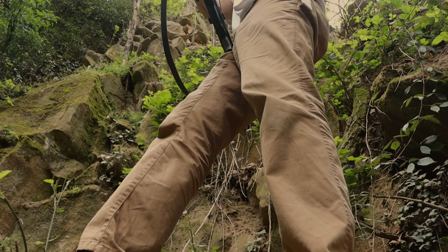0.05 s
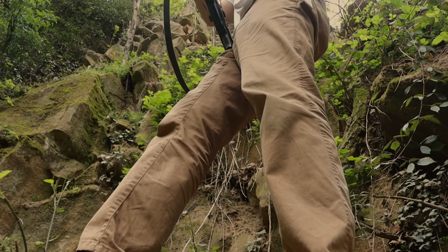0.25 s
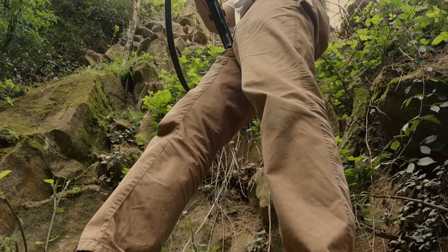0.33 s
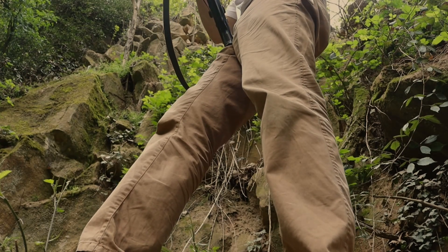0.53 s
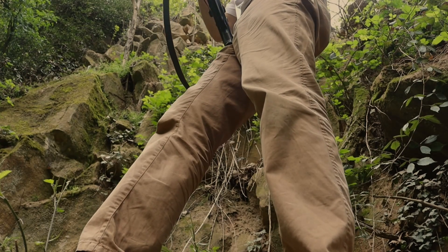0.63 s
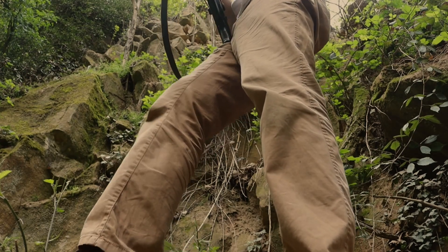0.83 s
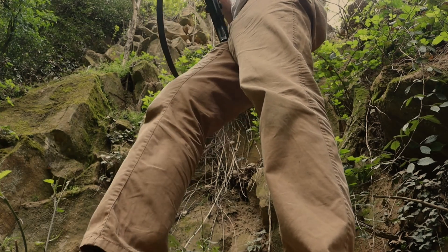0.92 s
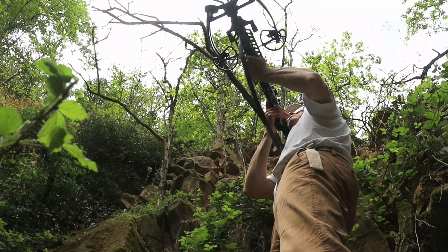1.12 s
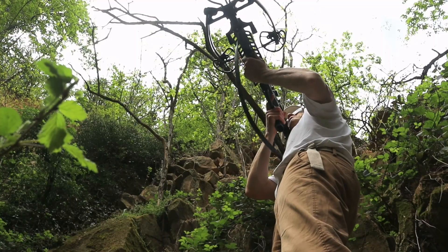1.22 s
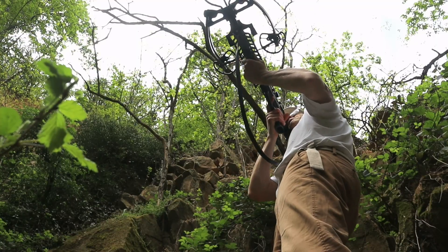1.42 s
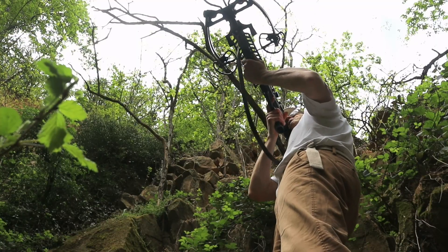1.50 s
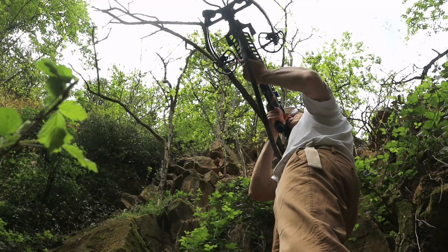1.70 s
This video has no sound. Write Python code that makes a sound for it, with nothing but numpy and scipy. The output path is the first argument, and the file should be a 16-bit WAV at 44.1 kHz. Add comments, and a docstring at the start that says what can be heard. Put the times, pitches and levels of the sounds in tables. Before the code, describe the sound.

A crossbow handled close to the microphone ticks lightly, then snaps twice and rattles briefly. Clothing rustles and a songbird whistles behind it. The woods then turn quieter, leaving distant bird calls and a faint low drone.

```python
"""A crossbow handled close to the microphone in a wood: the stock ticks under load, a catch snaps twice, parts
slide and rattle. Each contact rings the stock or frame and scatters off nearby rock and ground. Clothing
rustles. A songbird whistles a falling-and-rising phrase, then a flourish that lingers among the trees. Just
before one second the scene changes to a quieter, deeper wood with far calls and a low drone."""
import sys
import numpy as np
from scipy import signal
from scipy.fft import rfft, irfft
from scipy.io import wavfile
from scipy.ndimage import uniform_filter1d

SR = 44100
rng = np.random.default_rng(int(sys.argv[2]) if len(sys.argv) > 2 else 0)


def file_out(sig):
    """Save sig as 16-bit WAV at sys.argv[1]."""
    # one column per channel
    cols = np.atleast_2d(sig).T
    # limit, then scale
    lim = np.clip(cols, -1, 1)
    pcm = np.round(lim * 32767).astype(np.int16)
    wavfile.write(sys.argv[1], SR, pcm)


N = 77175
T = np.arange(N) / SR

# Levels are relative within each table.
# woodland air, early and late, and its side signal against the middle: frequency_hz, level_db
EARLY_AIR_COLOUR = [(15, -36), (25, -5.5), (200, 4.5), (344, -9), (695, -5), (775, -6.5), (1740, -12),
                    (2410, -7.5), (2760, -17), (4870, -11), (6380, -20), (13200, -29), (16000, -32)]
LATE_AIR_COLOUR = [(15, -34), (25, -15.5), (130, -0.5), (185, -6), (263, -11), (384, -18), (451, -15),
                   (516, -19), (796, -14.5), (1480, -21.5), (2410, -22), (2990, -24), (3720, -27.5),
                   (5000, -30), (16000, -39)]
AIR_WIDTH = [(30, 0), (120, -12.5), (270, -0.5), (700, -4.5), (3000, -3), (14000, 5)]
# swell of the far drone and of the close clothing: time_s, level_db
DRONE_SWELL = [(0, -67), (1.05, -64), (1.25, -57), (1.45, -53), (1.62, -56), (1.75, -60)]
RUSTLE_SWELL = [(0, -44.5), (.06, -56.5), (.17, -57), (.25, -49), (.30, -47.5), (.36, -50), (.43, -45),
                (.62, -50.5), (.80, -86), (.99, -53)]
# sleeve scuffs: centre_s, half_width_s, level_db
SLEEVE_SCUFFS = [(0.891, 0.012, -56), (0.948, 0.027, -54), (0.96, .007, -54), (0.977, .003, -47)]
# spectra of rustle and scuffs: frequency_hz, level_db
CLOTH_COLOUR = [(300, -8.5), (900, -6.5), (1900, -9.5), (3000, -4.5), (6000, -8.5), (15000, -16.5)]
SLEEVE_COLOUR = [(300, -22), (600, -2), (850, 13), (1300, 2.5), (2000, 1.5), (3000, -14), (6000, -34),
                 (15000, -36)]

# light ticks of the stock: start_s, level_db, tilt_db_per_octave
STOCK_TICKS = [(.0007, -27.5, 0.5), (0.0448, -21.5, 3.5), (0.0553, -36, -3), (0.0772, -33, -6.5),
               (0.1042, -29, 0), (0.1312, -28, -1.5), (0.1371, -36, -3), (0.2072, -20.5, 2.1),
               (0.2328, -21, 3), (0.2362, -30.5, 9.5)]
# snaps and knocks of the catch: start_s, level_db, tilt_db_per_octave, hollow_db
CATCH_SNAPS = [(0.4454, -8.5, -1, -37), (.447, -10, 1.2, -28), (0.457, -33, -1.5, -24),
               (0.4598, -21.5, -3.5, -22), (0.503, -4.5, 3, -7.5), (.504, -10, 0.5, -0.5),
               (.5374, -17, -3, -7.5), (0.5381, -15, 7, -27), (.5474, -11, 6.5, -25), (0.555, -14, 3, -25),
               (0.5591, -14.5, -0.5, 1), (.5685, -17.5, 2.5, -1), (.576, -23, -8.5, -21)]
# lasting modes of stock and frame: pitch_hz, level_db, t60_s
STOCK_RESONANCES = [(1176, -15.5, 0.077), (1293, -11, 0.097), (1700, -2, 0.01), (1848, -1.5, .04),
                    (2330, -11.5, 0.083), (2970, -7.5, 0.042), (5490, -4, 0.0085), (6250, -34, 0.026)]
FRAME_RESONANCES = [(728, -20, 0.039), (966, -19, 0.044), (1069, -14, 0.18), (1202, -8, 0.07),
                    (1790, -5.5, 0.082), (2000, -22, 0.047), (2444, -15, 0.046), (2967, -6, 0.068),
                    (3137, -2.5, 0.04), (3810, 0.5, 0.021), (4543, -2.5, 0.049), (6796, -2.5, 0.029),
                    (7580, -2, 0.023), (10830, -4.5, 0.03)]
# spectra of their dense, brief modes and of the sliding contact: frequency_hz, level_db
STOCK_CRACK = [(300, -21.5), (850, -8.5), (1250, 6), (1850, 8.5), (2200, -3.5), (4300, -5.5), (5600, -4.5),
               (10000, -11), (15000, -38.5)]
FRAME_CRACK = [(200, -51), (460, -33), (680, 1), (1100, 0), (1450, -6.5), (2000, 4), (2900, -0.5),
               (3450, -5.5), (5000, -1.5), (7300, -2.5), (9000, -4), (12500, -6), (16000, -19)]
GRIT_COLOUR = [(250, -28), (530, -26), (680, 15), (1000, 11), (1900, -3), (2900, 8.5), (3450, -10),
               (4300, 3), (7300, 0.5), (9300, -9), (10800, -8), (12300, 1.5), (15000, -21)]
# swell of the sliding contact: time_s, level_db
SLIDE_SWELL = [(.522, -58), (.531, -34), (.543, -31), (.557, -21.5), (.570, -25.5), (.580, -32),
               (.590, -60)]

# the songbird's two notes: time_in_note_s, pitch_hz, level_db
FALLING_NOTE = [(0, 7100, -14), (.015, 6320, -15), (.034, 5350, -9.5), (.049, 4700, 0), (.064, 4150, -12.5),
                (.076, 4300, -13)]
RISING_NOTE = [(0, 2800, -27), (.009, 3365, -6), (.013, 4105, 0), (.022, 4120, -6), (.025, 3900, -23)]
# their repeats: start_s, level_db
FALLING_REPEATS = [(.031, -37), (.201, -33.5), (.372, -35.5), (.549, -34)]
RISING_REPEATS = [(0.112, -37.5), (.286, -34), (.460, -31), (.638, -33)]
# closing strokes and distant whistles, one list each: time_s, pitch_hz, level_db
FLOURISH_STROKES = [
    [(.716, 7600, -58), (.725, 5900, -45), (.731, 4500, -41), (.736, 3200, -49)],
    [(.733, 3000, -54), (.749, 3800, -40), (.757, 3950, -49), (.764, 4800, -37.5), (.778, 5300, -52)],
    [(.745, 2400, -56), (.762, 2300, -48.5), (.772, 2750, -52.5), (.779, 4000, -42), (.784, 5300, -67)],
]
FAR_WHISTLES = [
    [(1.0, 4580, -57), (1.03, 4530, -57), (1.062, 4470, -59)],
    [(1.27, 3830, -61), (1.315, 3720, -51.5), (1.355, 3600, -52), (1.42, 3730, -57)],
    [(1.09, 2206, -62.5), (1.2, 2135, -66.5), (1.36, 2180, -59.5), (1.46, 2400, -66)],
    [(1.465, 2434, -48), (1.50, 2472, -50.5), (1.54, 2470, -63)],
    [(1.574, 2470, -47), (1.60, 2490, -57.5), (1.65, 2490, -65), (1.68, 2403, -68)],
    [(1.47, 4540, -54), (1.495, 4520, -57), (1.56, 4330, -67)],
    [(1.725, 3760, -62), (1.75, 3700, -51)],
]
# one distant hoarse, rising call: time_s, pitch_hz, level_db
FAR_HOARSE_CALL = [(1.31, 3670, -56), (1.37, 3660, -51), (1.43, 3850, -53.5), (1.50, 4110, -54),
                   (1.57, 4360, -71)]


def undb(db):
    """Decibels to gain."""
    return 10 ** (np.asarray(db) / 20)


def unit(x):
    """Scale to rms 1."""
    return x / np.sqrt(np.mean(x ** 2) + 1e-20)


def curve(points, t):
    """Straight lines between (time_s, value) points."""
    return np.interp(t, *np.array(points).T)


def colour(x, points):
    """Filter by (frequency_hz, level_db) points."""
    hz, db = np.array(points).T
    bins_hz = np.maximum(np.fft.rfftfreq(x.shape[-1], 1 / SR), 1)
    return irfft(rfft(x) * undb(np.interp(np.log(bins_hz), np.log(hz), db)), x.shape[-1])


def stereo(mid, side):
    """Left and right from mid and side."""
    return np.array([mid + side, mid - side])


def fade(t, t60):
    """Exponential decay, 60 dB down after t60 seconds."""
    return np.exp(-np.log(1000) * t / t60)


def add(out, x, start_s):
    """Mix a sound in at its time."""
    i = max(int(start_s * SR), 0)
    out[:, i:i + x.shape[1]] += x[:, :N - i]


def wander(rate_hz):
    """Smooth random motion with rms 1."""
    span = max(int(SR / rate_hz), 1)
    return unit(uniform_filter1d(uniform_filter1d(rng.standard_normal(N), span), span))


def echoes(x, t60, side, build_s=0.0021):
    """Diffuse reflections that build up and die away at the microphone."""
    mid, wide = rng.standard_normal((2, N))
    envelope = fade(T, t60) * (1 - np.exp(-T / build_s))
    tail = unit(stereo(mid, side * wide) * envelope) / np.sqrt(N)
    return signal.fftconvolve(x[None], tail, axes=1)[:, :N]


def woodland_air(shape, level_db):
    """A soft, wide hush all around the microphone."""
    mid, side = colour(rng.standard_normal((2, N)), shape)
    return unit(stereo(mid, colour(side, AIR_WIDTH))) * undb(level_db + 0.2 * wander(2.3))


def far_drone(pitch_hz=49):
    """A low, wavering tone a long way off, faint at first and swelling late."""
    wavering_hz = pitch_hz * (1 + .03 * wander(11))
    return np.sin(2 * np.pi * np.cumsum(wavering_hz) / SR) * undb(curve(DRONE_SWELL, T))


def clothing():
    """Close by, cloth brushes unevenly as the arms move, with brief scuffs of a sleeve."""
    mid, side = unit(colour(rng.standard_normal((2, N)), CLOTH_COLOUR))
    rustle = stereo(mid, 0.41 * side) * undb(curve(RUSTLE_SWELL, T) + 1 + 1.4 * wander(130))
    mid, side = unit(colour(rng.standard_normal((2, N)), SLEEVE_COLOUR))
    scuffs = sum(undb(db) * np.exp(-.5 * ((T - at) / width) ** 2) for at, width, db in SLEEVE_SCUFFS)
    return rustle + stereo(mid, 0.16 * side) * scuffs * undb(2.3 * wander(400))


def contact(modes, shape, tilt_db, crack_t60_s, ring_db, attack_s=0.00021, width=0.14, size=8192):
    """One contact: a crack of dense modes whose treble dies first, and a few lasting modes."""
    t = T[:size]
    bins_hz = np.maximum(np.fft.rfftfreq(size, 1 / SR), 1)
    phases = np.exp(2j * np.pi * rng.random((2, len(bins_hz))))
    tilted_noise = irfft(phases * undb(tilt_db * np.log2(bins_hz / 3000)))
    spectrum = rfft(unit(colour(tilted_noise, shape)))
    octave = np.clip(np.log2(bins_hz / 500), 0, 5)
    attack = 1 - np.exp(-t / attack_s)
    mid = side = 0
    for k in range(6):  # the crack, octave by octave; crack_t60_s holds at 2 kHz
        hz = 500 * 2 ** k
        band = irfft(spectrum * np.maximum(1 - abs(octave - k), 0))
        envelope = attack * fade(t, crack_t60_s * (hz / 2000) ** -0.4)
        strength = np.sqrt(np.mean(band ** 2) * np.mean(envelope ** 2))
        mid += strength * unit(band[0] * envelope)
        side += strength * unit(band[1] * envelope) * min(width * hz / 2500, .55)
    for k, (hz, db, t60) in enumerate(modes):
        gain = (-1) ** k * undb(ring_db + db + tilt_db * np.log2(hz / 3000))
        ring = gain * attack * fade(t, t60)
        phase = 2 * np.pi * hz * (1 + .003 * rng.standard_normal()) * t
        mid += ring * np.sin(phase)
        side += ring * np.cos(phase) * min(width * hz / 3000, .5)
    return stereo(mid, side)


def stock_ticks():
    """The stock ticks under load and rings briefly."""
    out = np.zeros((2, N))
    for start_s, db, tilt_db in STOCK_TICKS:
        tick = contact(STOCK_RESONANCES, STOCK_CRACK, tilt_db, crack_t60_s=0.021, ring_db=-5.5)
        add(out, undb(db) * tick, start_s)
    return out


def crossbow(parts, radiation_hz=508):
    """The small parts radiate little bass; rock and ground scatter their sound back to the microphone."""
    direct = signal.sosfilt(signal.butter(3, radiation_hz, "high", fs=SR, output="sos"), parts)
    mono = direct.mean(axis=0)
    near = echoes(colour(mono, [(1000, -1.5), (6000, 1.5), (12000, -3.5)]), t60=0.12, side=1)
    near_side = colour(near[0] - near[1], [(600, -16), (1500, -39), (5000, -2)])
    far = echoes(mono, t60=0.36, side=0.12)
    return direct + undb(-8.5) * stereo(near.mean(axis=0), near_side) + undb(-25) * far


def bird_note(points, waver, start_s=0, level_db=0, flutter_db=2.5):
    """A gliding whistle whose level flutters; waver is the random share of its pitch."""
    times, hz, db = np.array(points).T
    t = T - start_s
    pitch_hz = np.interp(t, times, hz) * (1 + waver * wander(700))
    tone = np.sqrt(2) * np.sin(2 * np.pi * np.cumsum(pitch_hz) / SR)
    gate = np.clip(np.minimum(t - times[0], times[-1] - t) / 0.0031 + .5, 0, 1)
    flutter = unit(undb(flutter_db * wander(170)))
    return tone * undb(np.interp(t, times, db) + level_db) * gate * flutter


def songbird(waver=.034):
    """One bird sings four falls and rises and a flourish, echoed by trunks and leaves."""
    song = sum(bird_note(FALLING_NOTE, waver, start_s, db) for start_s, db in FALLING_REPEATS)
    song += sum(bird_note(RISING_NOTE, waver, start_s, db) for start_s, db in RISING_REPEATS)
    song += sum(bird_note(stroke, waver) for stroke in FLOURISH_STROKES)
    early = echoes(song, t60=0.058, side=0.53)
    lingering = echoes(song, t60=0.61, side=0.43)
    return undb(-3) * song + undb(-5.5) * early + undb(-4.5) * lingering


def low_bump(centre_s=0.242, half_width_s=0.018, pitch_hz=156.7, level_db=-46.5):
    """A dull, brief swell in the bass under the last ticks."""
    swell = np.exp(-.5 * ((T - centre_s) / half_width_s) ** 2)
    return undb(level_db) * np.sin(2 * np.pi * pitch_hz * T) * swell


def hollow_tone(pitch_hz=666.3, t60_s=0.049):
    """The hollow body of the frame rings at one pitch."""
    t = T[:8192]
    return np.sin(2 * np.pi * pitch_hz * t) * fade(t, t60_s)


def catch_snaps():
    """The catch snaps and rattles, ringing the frame and its hollow body."""
    out = np.zeros((2, N))
    for start_s, db, tilt_db, hollow_db in CATCH_SNAPS:
        snap = contact(FRAME_RESONANCES, FRAME_CRACK, tilt_db, crack_t60_s=0.015, ring_db=-16.5)
        add(out, undb(db) * (snap + undb(hollow_db - 4.5) * hollow_tone()), start_s)
    return out


def sliding_parts(grain_db=4.5, body_db=-6.5):
    """A short, gritty slide that also sounds the hollow frame."""
    grit = unit(rng.standard_normal((2, N)) * undb(grain_db * wander(900)))
    touching = (T > SLIDE_SWELL[0][0]) & (T < SLIDE_SWELL[-1][0])
    swell = undb(curve(SLIDE_SWELL, T)) * touching
    mid, side = unit(colour(grit, GRIT_COLOUR)) * swell
    side = colour(side, [(700, -30), (2500, -21), (6000, -16)])
    body = unit(signal.fftconvolve(grit[0], hollow_tone())[:N])
    return stereo(mid, side) + undb(body_db) * swell * body


def far_birds():
    """Thin whistles and one hoarse call from deep in the wood, more echo than direct sound."""
    calls = sum(bird_note(call, waver=.005) for call in FAR_WHISTLES)
    calls += bird_note(FAR_HOARSE_CALL, waver=.09)
    return undb(-6.5) * calls + undb(-5) * echoes(calls, t60=0.74, side=0.46)


def scene(change_s=0.96, crossfade_s=0.014):
    """The close crossbow under the song, then the quieter wood; the drone runs through both."""
    song = songbird()
    calls = far_birds()
    drone = far_drone()
    handling = crossbow(stock_ticks() + catch_snaps() + sliding_parts()) + clothing() + low_bump()
    early = handling + song + woodland_air(EARLY_AIR_COLOUR, level_db=-49.5)
    late = calls + woodland_air(LATE_AIR_COLOUR, level_db=-50)
    late_share = np.clip((T - change_s) / crossfade_s + .5, 0, 1)
    return np.sqrt(1 - late_share) * early + np.sqrt(late_share) * late + drone


def record(dry, low_cut_hz=40, ceiling=.85, top_hz=16000):
    """The recorder drops the deepest rumble, rounds the highest peaks and cuts the top."""
    x = signal.sosfilt(signal.butter(4, low_cut_hz, "high", fs=SR, output="sos"), dry)
    x = x / (1 + (x / ceiling) ** 6) ** (1 / 6)
    return signal.sosfilt(signal.ellip(8, .2, 80, top_hz, fs=SR, output="sos"), x)


dry = scene()
out = record(dry)
file_out(out)
```